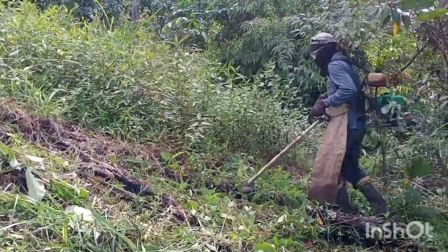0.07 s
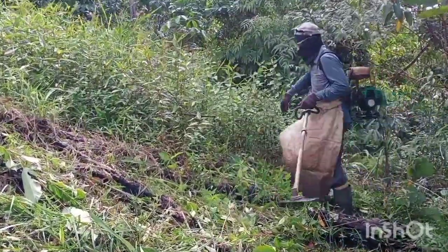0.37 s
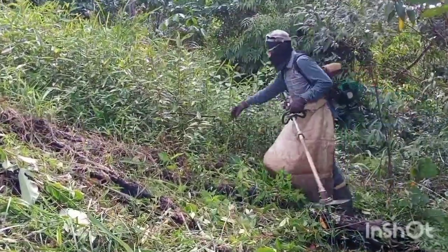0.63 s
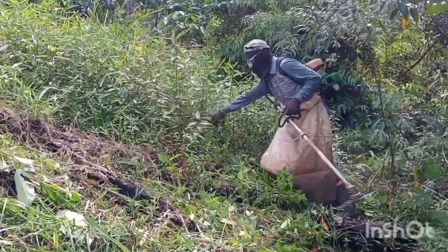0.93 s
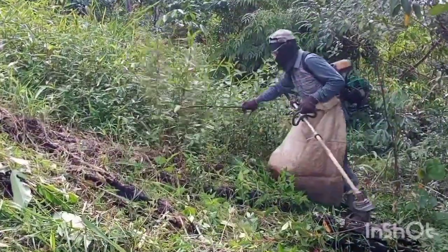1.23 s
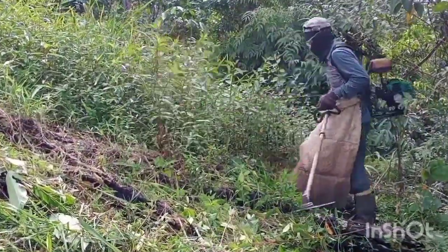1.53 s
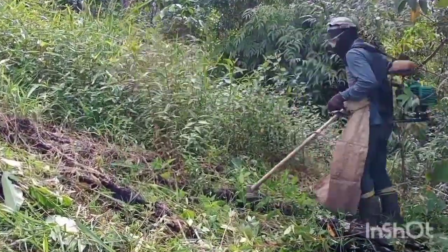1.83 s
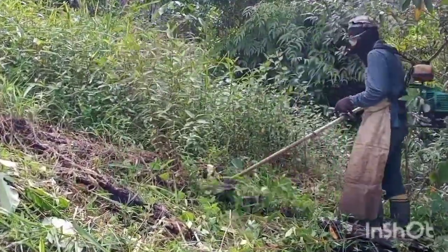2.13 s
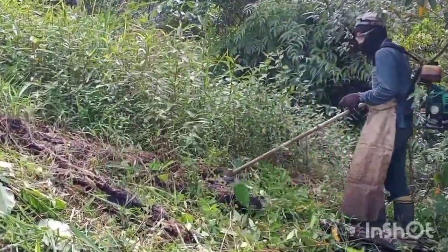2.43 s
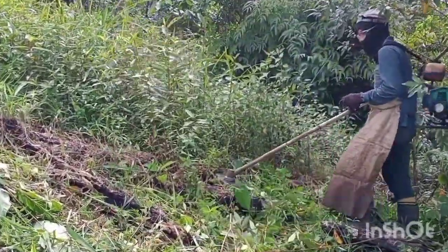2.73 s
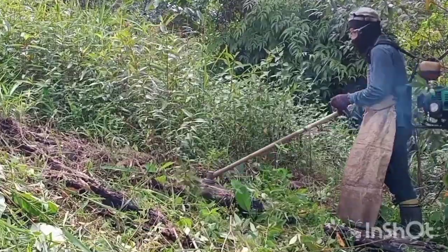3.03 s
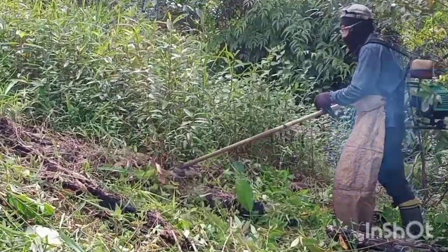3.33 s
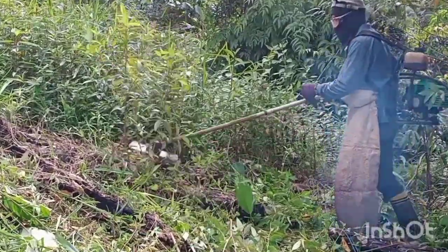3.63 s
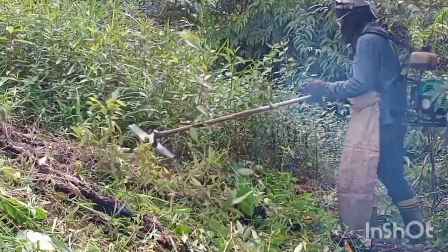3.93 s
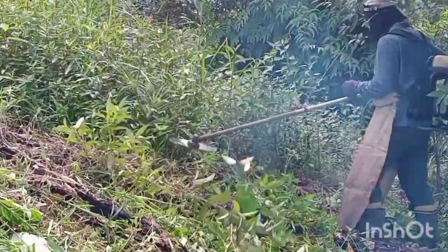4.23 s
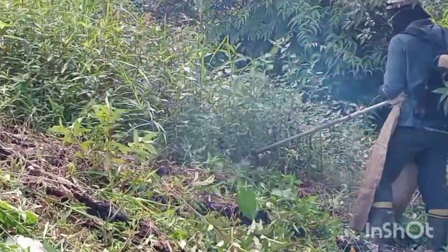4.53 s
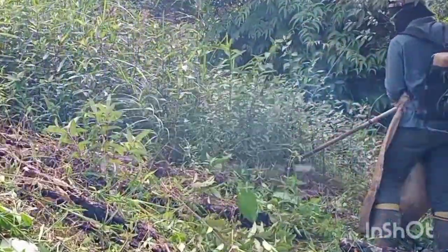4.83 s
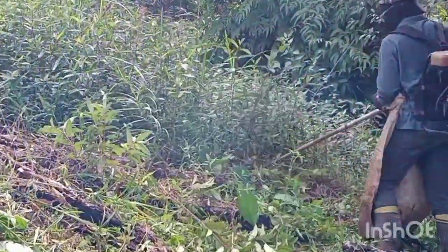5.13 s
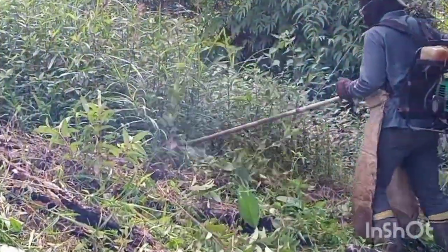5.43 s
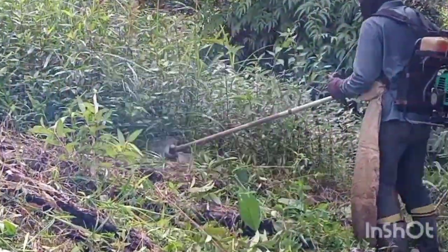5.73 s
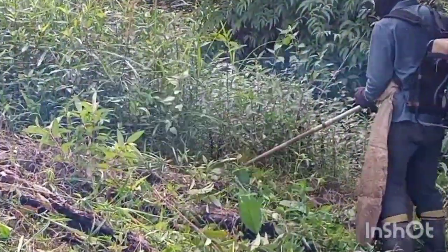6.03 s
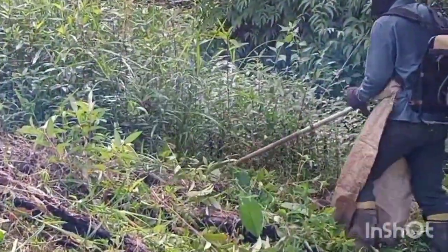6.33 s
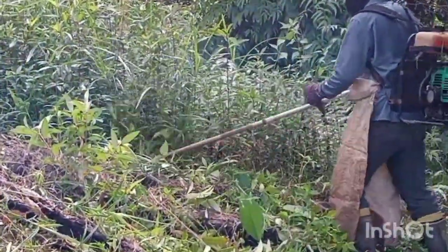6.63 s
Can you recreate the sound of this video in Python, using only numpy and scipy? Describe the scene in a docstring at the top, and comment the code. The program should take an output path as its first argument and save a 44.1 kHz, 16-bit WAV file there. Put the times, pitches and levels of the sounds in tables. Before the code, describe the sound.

On an overgrown slope, a small two-stroke brush cutter idles with uneven pops while twigs tick on its blade and a cicada buzzes and fades. The engine then revs to a snarling whine three times, sagging in between, as the blade shreds leaves, chops stems and pings against hard stalks. A brief rising whistle comes during the second rev, and the cicada returns near the end. The microphone is a few metres away.

```python
"""A backpack brush cutter on an overgrown slope. First its small two-stroke engine idles, popping on about
every third turn, while twigs tick on the steel blade and a clicking cicada buzzes and fades. From 2.4 s
the throttle is pulled three times, with coasting in between: the engine fires every second turn and the
blade tears leaves and chops stems. In the second pull the worker turns, stalks scrape the blade and a
short whistle rises. Near the end the cicada is back and the third pull begins."""
import sys
import numpy as np
from scipy import signal
from scipy.fft import rfft, irfft
from scipy.io import wavfile
from scipy.ndimage import uniform_filter1d

SR = 44100
rng = np.random.default_rng(int(sys.argv[2]) if len(sys.argv) > 2 else 0)


def master_out(mix):
    """Clip the mix to full scale and print it as 16-bit PCM to the path in sys.argv[1]."""
    frames = np.transpose(np.atleast_2d(mix))
    ceiling = np.clip(frames, -1, 1)
    pcm = np.round(ceiling * 32767).astype(np.int16)
    wavfile.write(sys.argv[1], SR, pcm)


N = 298998
TIME = np.arange(N) / SR

def undb(db):
    """Turn decibels into a gain."""
    return 10 ** (np.asarray(db) / 20)

def curves(table):
    """Join each column of a table by straight lines in time."""
    times, *columns = np.transpose(table)
    return [np.interp(TIME, times, column) for column in columns]

def unit(x):
    """Scale to an average (rms) level of 1."""
    return x / np.sqrt(np.mean(x ** 2))

def even(x):
    """Hold the average level at 1; quick detail stays."""
    size = SR // 7
    return x / np.sqrt(uniform_filter1d(uniform_filter1d(x ** 2, size), size) + 1e-18)

def fade(x, decay_s):
    """Give every click a dying tail."""
    return signal.lfilter([1], [1, -np.exp(-1 / (decay_s * SR))], x)

def ring(x, modes):
    """Ring several notes at once; alternating signs avoid holes between them."""
    return sum((-1) ** k * undb(db) * signal.lfilter(*signal.iirpeak(hz, hz / width_hz, SR), x)
               for k, (hz, width_hz, db) in enumerate(modes))

def colour(x, points, size=2048):
    """Shape the tone along (pitch, level) points; white noise keeps its power."""
    hz, db = np.transpose(points)
    grid = np.maximum(np.arange(size // 2 + 1) * SR / size, 1)
    cepstrum = irfft(np.log(undb(np.interp(np.log(grid), np.log(hz), db))))
    cepstrum[1:size // 2] *= 2  # folded so that nothing sounds before its cause
    cepstrum[size // 2 + 1:] = 0
    response = irfft(np.exp(rfft(cepstrum)))
    return signal.fftconvolve(x, response / np.linalg.norm(response))[:N]

def walk(rate):
    """Glide to a new random value, roughly within 1 of zero, rate times a second."""
    step = int(SR / rate)
    return 1.2 * uniform_filter1d(np.repeat(rng.standard_normal(N // step + 1), step), step)[:N]

def clicks(times, sizes):
    """One click at each time, shared between two neighbouring samples."""
    place = np.clip(times * SR, 0, N)
    i = place.astype(int)
    before = np.bincount(i, sizes * (1 - place + i), N + 2)
    after = np.bincount(i + 1, sizes * (place - i), N + 2)
    return (before + after)[:N]

def grains(rate, spread_db):
    """Tiny random cracks of unequal size, about rate a second."""
    hit = rng.random(N) < rate / SR
    return unit(hit * rng.choice([-1, 1], N) * undb(spread_db * np.clip(rng.standard_normal(N), -3, 2)))

def strokes(cycles, scatter_db, jitter_s, lead_s=0, alternation=.91):
    """One pulse a cycle; a strong one tends to follow a weak one, and comes up to lead_s early."""
    times = np.interp(np.arange(1, int(cycles[-1]) + 1), cycles, TIME)
    chance = rng.standard_normal((len(times), 2))
    strength = np.tanh(signal.lfilter([1], [1, alternation], chance[:, 0]))
    return -clicks(times - lead_s * strength + jitter_s * chance[:, 1], undb(scatter_db * strength))

def bush_echo(x, echo_db, fade_s):
    """Ground and bushes scatter a short, weak echo."""
    age = TIME[:SR // 4]
    tail = rng.standard_normal(len(age)) * undb(-60 * age / fade_s) * (age > .003)
    return x + undb(echo_db) * signal.fftconvolve(x, tail / np.linalg.norm(tail))[:N]

# tone of the outdoor air: (pitch [Hz], level [dB])
AIR_TONE = [(25, -17), (70, -8), (200, -8.5), (600, -10), (1500, -29), (5000, -64), (15000, -52)]
def air(level_db=-49):
    """Outdoor air makes a faint, low rush."""
    return undb(level_db) * colour(rng.standard_normal(N), AIR_TONE)

# cicada calls: (full voice at [s], fades from [s], level [dB], body pitch [Hz])
CALLS = [(0, 1.72, -35.5, 6120), (6.2, 7.7, -39, 6126)]
def cicada(click_hz=215.8, rise_db_per_s=18, sag_db_per_s=4, fade_db_per_s=23, sink_hz_per_s=200):
    """Fast, regular clicks ring the insect's body, whose note sinks and narrows as a call tires."""
    cycles = np.cumsum(click_hz * (1 + .00225 * walk(150))) / SR
    gain, weighted_hz, weighted_width = 1e-18, 0, 0
    for full, fades, db, start_hz in CALLS:
        age = np.clip(TIME - full, 0, fades - full)
        call = undb(db - rise_db_per_s * np.maximum(full - TIME, 0) - sag_db_per_s * age
                    - fade_db_per_s * np.maximum(TIME - fades, 0))
        gain += call
        weighted_hz += call * (start_hz - sink_hz_per_s * age)
        weighted_width += call * 870 * np.exp(-age / 5.4)
    centre_hz, width_hz = weighted_hz / gain, weighted_width / gain
    out = 0
    for k in range(24, 41):  # overtones of the click rate
        hz = k * click_hz
        body = 1 / (1 + ((hz - centre_hz) / width_hz) ** 2) ** 2
        upper_peak = .52 / (1 + ((hz - 8200) / width_hz) ** 2)
        flutter = undb(2 * walk(35) + 2 * walk(7))
        out += (body + upper_peak) * flutter * np.sin(2 * np.pi * (k * cycles + rng.random()))
    return even(out) * gain

# path of the whistle: (time [s], pitch [Hz], level [dB])
WHISTLE_PATH = [(5.44, 1062, -55), (5.52, 1115, -34), (5.61, 1286, -29), (5.68, 1391, -38),
                (5.76, 1460, -52)]
def whistle():
    """A slightly unsteady tone slides upward."""
    hz, db = curves(WHISTLE_PATH)
    sounding = (TIME > WHISTLE_PATH[0][0]) & (TIME < WHISTLE_PATH[-1][0])
    cycles = np.cumsum(hz * (1 + .0095 * walk(120))) / SR
    return np.sqrt(2) * np.sin(2 * np.pi * cycles) * undb(db) * sounding

# twigs touching the blade: (time [s], level [dB])
TWIG_HITS = [(0.081, -33.5), (.11, -32), (.146, -30), (.171, -30), (0.23, -30), (.363, -39), (0.392, -28.5),
             (0.697, -30), (.861, -36), (0.899, -32), (.944, -31.5), (1.227, -33), (1.662, -34.5),
             (1.932, -32), (2.175, -35), (2.398, -40), (2.432, -32)]
# tone of a twig: (pitch [Hz], level [dB])
TWIG_TONE = [(900, -16), (2300, -3.5), (3500, -3), (5200, -9), (7000, -4), (7800, 3), (8500, 4),
             (10500, -6), (15000, -18)]
def twigs(decay_s=.01):
    """Each twig ticks on the slowly turning blade with a small, dry crackle."""
    envelope, age = np.zeros(N), TIME[:SR // 10]
    for start, db in TWIG_HITS:
        i = int(start * SR)
        envelope[i:i + len(age)] += undb(db) * np.exp(-age / decay_s)
    return colour(envelope * grains(rate=5000, spread_db=-4), TWIG_TONE)

# tone of tearing grass: (pitch [Hz], level [dB])
GRASS_TONE = [(3000, -12), (6000, -7), (9500, 0), (12500, 0), (15500, -6)]
def grass(middle_s=5.57, half_length_s=.13, level_db=-34):
    """Soft grass tears into an airy spray of fine cracks."""
    swell = np.exp(-((TIME - middle_s) / half_length_s) ** 2)
    return colour(grains(rate=9900, spread_db=3), GRASS_TONE) * swell * undb(level_db)

# notes of the blade and its guard: (pitch [Hz], time to fade 60 dB [s], level when scraped [dB])
BLADE_NOTES = [(395.7, 0.52, -23), (2345, 0.15, -3), (3020, 0.029, 0), (3525, 0.14, 1), (4160, 0.092, -9),
               (4770, 0.2, -1), (6280, 0.14, -1), (6940, 0.061, -9), (8640, 0.099, 9), (9400, 0.071, -3)]
# woody stalks scraping: (time [s], length [s], level [dB])
STALK_SCRAPES = [(4.772, .06, -30), (4.86, .095, -26.5)]
def scrapes(width_hz=59.6, edge_s=.0067):
    """A stalk catches and slips over the steel; its touch rings, damps and widens every note."""
    pressure = sum(undb(db) * np.clip(np.minimum(TIME - start, start + length - TIME) / edge_s, 0, 1)
                   for start, length, db in STALK_SCRAPES)
    friction = grains(rate=3000, spread_db=3) * undb(3 * walk(90))
    return even(ring(friction, [(hz, width_hz, db) for hz, _, db in BLADE_NOTES])) * pressure

# hard stalks hitting the blade: (time [s], level [dB], favoured pitch [Hz])
STALK_HITS = [(.652, -34, 2350), (.654, -32, 4070), (1.439, -34.5, 2330), (1.487, -33, 2930),
              (3.477, -12.5, 3320), (3.718, -28, 380.5), (3.872, -19.5, 7140), (4.681, -26, 8510),
              (4.785, -26, 3480), (4.87, -17, 8610), (5.152, -13.5, 2300), (5.205, -23, 2403),
              (5.211, -21, 4000), (5.287, -16, 8500), (5.81, -27, 400), (6.025, -17, 8430),
              (6.09, -34, 400)]
def pings(spread_octaves=.11, rise_s=.0005):
    """A stalk rings the blade's notes near one pitch; it keeps touching, so the ring is rough."""
    out, age = np.zeros(N), TIME[:SR // 3]
    swell = 1 - np.exp(-age / rise_s)
    for start, db, favoured_hz in STALK_HITS:
        i = int(start * SR)
        touch, slip = walk(300)[:len(age)], walk(400)[:len(age)]
        for hz, fade_s, _ in BLADE_NOTES:
            share = 1 / (1 + (np.log2(hz / favoured_hz) / spread_octaves) ** 2)
            envelope = share * swell * undb(db - 60 * age / fade_s + 2.2 * touch)
            out[i:i + len(age)] += envelope * np.sin(2 * np.pi * hz * age + .75 * slip)
    return out

# bright notes of the blade: (pitch [Hz], width [Hz], level [dB])
SPATTER_NOTES = [(7720, 200, 2.5), (8500, 480, 5.5), (9520, 120, -5)]
def spatter():
    """Flung bits of leaf strike the blade; each rings it briefly."""
    strikes = fade(np.abs(grains(rate=110, spread_db=2.2)), decay_s=.0025)
    return even(ring(strikes * rng.standard_normal(N), SPATTER_NOTES))

# notes of the casing and shaft tube: (pitch [Hz], width [Hz], level [dB])
CASING_NOTES = [(1962, 75, 3.5), (2316, 82, 3.5), (2805, 80, -2.5), (3377, 110, 1), (3580, 100, 3)]
def rattle(tufts):
    """Loose metal parts tick against the casing and the shaft tube."""
    return even(sum(ring(grains(rate=160, spread_db=6) * tufts, [note]) for note in CASING_NOTES))

# sweeps through plants: (deepest at [s], half length [s], leaf hiss [dB], stem crackle [dB])
BLADE_SWEEPS = [(0.297, 0.81, -46.5, -45), (2.014, 0.32, -51.5, -45.5), (2.616, 0.022, -40, -29),
                (3.316, 0.083, -27.5, -26.5), (3.424, 0.048, -23, -29), (3.488, 0.018, -20, -25),
                (3.767, 0.16, -38, -30.5), (4.685, 0.045, -29, -24.5), (4.786, 0.015, -31, -20),
                (4.906, 0.093, -40, -30), (5.22, 0.077, -25, -22.5), (5.42, 0.53, -27.5, -23.5),
                (5.853, 0.022, -20, -25), (6.033, 0.06, -22, -26), (6.239, 0.064, -27, -27),
                (6.698, 0.26, -31, -28.5)]
def sweep_levels(revs, throttle, exit_share=.86):
    """Hiss and crackle in dB: the spinning blade and shaft, plus a swell for each sweep."""
    power = undb([-48.5 + 9 * revs + 5.5 * throttle, -43 + 12 * revs + 3 * throttle]) ** 2
    for deepest, length, hiss_db, crackle_db in BLADE_SWEEPS:
        width_s = np.where(TIME < deepest, length, length * exit_share)
        depth = np.exp(-((TIME - deepest) / width_s) ** 2)
        power += np.outer(undb([hiss_db, crackle_db]) ** 2, depth)
    return 10 * np.log10(power)

# tones of torn leaves and cracking stems: (pitch [Hz], level [dB])
LEAF_TONE = [(3000, -33.5), (5200, -8), (6300, -2.5), (7100, -10), (7600, 2.5), (8100, 2.5), (8550, 4.5),
             (9100, 0.5), (10200, -5), (12000, -12), (15500, -13)]
STEM_TONE = [(400, -27), (1000, -1), (1700, -5), (2350, -2), (2750, 2), (3400, -0.5), (4100, -3.5),
             (5200, -10.5), (6300, -10.5), (7500, 0.5), (12000, -24)]
def blade(turns, revs, throttle):
    """The blade shreds plants into dense cracks, bunched by the engine's beat and by uneven tufts."""
    hiss_db, crackle_db = sweep_levels(revs, throttle)
    cutting = np.clip((crackle_db + 36) / 12, 0, 1)
    beat = 1 + .067 * np.cos(np.pi * turns)
    tears = fade(np.abs(grains(rate=45, spread_db=2.5)), decay_s=.0031)
    tufts = beat * undb(.4 * walk(45) + 1.1 * walk(220)) * (1 + .26 * unit(tears))
    shared = grains(rate=2500, spread_db=2.5)
    leaf_cracks = (shared + .8 * rng.standard_normal(N)) * tufts * undb(1.4 * walk(70))
    stem_cracks = (1.07 * shared + grains(rate=5000, spread_db=2.8)) * tufts * undb(1.1 * walk(70))
    stems = even(colour(stem_cracks, STEM_TONE)) * undb(-5 + 1.16 * cutting)
    metal = rattle(tufts) * undb(-6 - 8.4 * cutting)  # stands out when little is cut
    leaves = even(colour(leaf_cracks, LEAF_TONE)) * undb(-.23) + spatter() * undb(-3.5)
    return leaves * undb(hiss_db) + (stems + metal) * undb(crackle_db)

# knocks and chopped stems: (time [s], level [dB], extra treble [dB], rise [s], hold [s])
STEM_CHOPS = [(0.459, -26.5, 3, .002, 0.0054), (.5585, -24, -10, .001, .001),
              (0.6505, -24, 2.5, 0.001, 0.0046), (1.434, -27.5, 0, 0.0033, .006),
              (1.487, -24, -0.5, 0.0033, 0.0049), (1.981, -23.5, -3.5, 0.0034, 0.007),
              (2.016, -27.5, -4, 0.0025, 0.0067), (2.568, -16.5, -4.5, 0.001, .004),
              (2.664, -16, -1, .002, .002), (2.832, -18, -1, 0.0026, .002),
              (2.996, -16, 0.5, 0.0018, 0.0016), (3.247, -15, -2, 0.0009, 0.0022),
              (3.277, -14, -2, 0.00075, 0.0034), (3.296, -10.5, -0.5, 0.00088, .003),
              (3.391, -16, 2.5, 0.0016, 0.0027), (3.406, -20, 2, .001, 0.0025),
              (3.4207, -11, 1, .001, 0.0044), (3.4385, -4, -0.5, 0.00093, 0.003),
              (3.457, -11, -8, .002, .004), (3.478, -8, -1, 0.0009, 0.0028), (3.498, -9, -11, .001, .002),
              (3.707, -12.5, -2, .007, 0.0093), (3.762, -15, -3.5, 0.00094, 0.0088),
              (3.796, -13, -2.5, 0.0056, 0.0057), (4.64, -17.5, 4.5, 0.0018, 0.0052),
              (4.678, -15, 2, .002, 0.0055), (4.755, -13, -0.5, 0.0022, 0.0038),
              (4.774, -13, 2, 0.0027, 0.0046), (4.855, -13.5, 4, 0.0023, .003),
              (4.869, -12.5, 3.5, 0.0019, 0.0048), (4.89, -17.5, 6.5, .002, .005),
              (5.16, -15, -4, 0.0021, .003), (5.286, -13.5, 2, .002, .004),
              (5.743, -7.5, -3, 0.00062, 0.017), (5.841, -17, -15, .004, 0.0096),
              (6.01, -13.5, -8, .003, 0.0076)]
# tone of a chop: (pitch [Hz], level [dB])
CHOP_TONE = [(100, 1.5), (400, 0), (900, 0.5), (1700, 1.5), (2400, 6.5), (3500, 5), (5200, 2.5), (6500, 9),
             (9000, 0), (15000, -32)]
def chops(decay_s=.0044):
    """Each stem splits in a burst of fibre cracks that lasts while the blade passes through."""
    body, bright = np.zeros(N), np.zeros(N)
    for start, db, treble_db, rise_s, hold_s in STEM_CHOPS:
        i = int(start * SR)
        age = TIME[:min(SR // 5, N - i)]
        dying = np.exp(-np.maximum(age - rise_s - hold_s, 0) / decay_s)
        burst = undb(db) * np.minimum(age / rise_s, 1) * dying
        body[i:i + len(age)] += burst
        bright[i:i + len(age)] += burst * undb(treble_db)
    fibres = grains(rate=14000, spread_db=-1.5)
    return undb(-8) * colour(body * fibres, CHOP_TONE) + undb(-4.5) * colour(bright * fibres, LEAF_TONE)

# tone of rushing gas: (pitch [Hz], level [dB])
RASP_TONE = [(150, -15), (350, -8), (450, -2), (700, -4.5), (1000, -14), (1350, -2.5), (1700, -12),
             (2050, -11.5), (3000, -17), (6000, -31)]
def rasp(turns):
    """Swirling gas follows each exhaust pulse."""
    puffs = 1 + .72 * np.exp(-(turns % 1) / .089)
    return even(colour(rng.standard_normal(N) * puffs, RASP_TONE))

# notes of the engine cover: (pitch [Hz], width [Hz], level [dB])
COVER_NOTES = [(2078, 69, 11.5), (3700, 650, -1.5)]
def clack(fired):
    """Hard firings rattle the cover."""
    jolts = fade(fired ** 2, decay_s=.0023)
    return even(ring(jolts * rng.standard_normal(N), COVER_NOTES))

# notes of the air intake, open and shut: (pitch [Hz], width [Hz], level [dB])
OPEN_NOTES = [(1138, 224, -1), (1492, 170, 2)]
SHUT_NOTES = [(1267, 180, 0)]
def intake(firings, throttle):
    """The air intake honks with each firing; another note joins as the throttle shuts."""
    honk = even(ring(ring(firings, OPEN_NOTES), OPEN_NOTES)) * undb(-40.5 + 5.6 * throttle)
    coast = even(ring(ring(firings, SHUT_NOTES), SHUT_NOTES)) * undb(-40) * (1 - throttle)
    return honk + coast

# tone of the muffler shell: (pitch [Hz], level [dB])
SNARL_TONE = [(600, -22.5), (920, -3.5), (1020, -6.5), (1170, 7), (1260, 6), (1400, 2.5), (1530, -4),
              (1680, -11), (1920, 2), (2150, -12), (3200, -28), (8000, -59)]
def snarl(firings):
    """The muffler shell gives off the high overtones of the firings."""
    return even(colour(firings, SNARL_TONE))

# tone of the buzz: (pitch [Hz], level [dB])
BUZZ_TONE = [(600, -30.5), (850, 12.5), (950, 9.5), (1100, 1), (1300, 7), (1480, 0.5), (1680, -6.5),
             (2100, 3), (3500, -38.5)]
def buzz(piston):
    """One piston pulse a turn blends into a buzz."""
    return even(colour(piston, BUZZ_TONE))

# tone of the growl: (pitch [Hz], level [dB])
GROWL_TONE = [(70, -41), (110, -3), (142, 0.5), (188, -6), (238, 2.5), (285, -0.5), (340, -39.5),
              (450, -37.5)]
def growl(cycles):
    """Strong and weak firings put a growl between the low overtones."""
    return even(colour(strokes(cycles, scatter_db=9.5, jitter_s=8e-5), GROWL_TONE))

def hum(turns):
    """The muffler's hollow rings on, two swings to a turn."""
    return np.sqrt(2) * np.cos(4 * np.pi * turns) * undb(walk(20))

def drone(cycles):
    """Steady firing makes one low tone."""
    return np.sqrt(2) * np.sin(2 * np.pi * (cycles + .71)) * undb(.28 * walk(33))

# stumbles of the idle: (start [s], end [s], extra level [dB])
IDLE_STUMBLES = [(.2, .36, 1), (.45, .8, -3), (.8, 1.13, -0.5), (1.37, 1.5, 3.5), (1.76, 2.08, 0.5),
                 (2.22, 2.42, -2.5)]
# gaps between pops in a stumble, picked at random: (gap [turns])
STUMBLE_GAPS = [2, 3, 3, 5]
# tone of a pop: (pitch [Hz], level [dB])
POP_TONE = [(45, -29), (85, -4), (150, -3.5), (230, -2.5), (330, -15.5), (600, -25), (1500, -66)]
def idle_pops(turns, scatter_db=2.5):
    """At idle the fuel fires every third turn; in a stumble it may fire early and weakly, or late."""
    pop_turns, sizes, turn = [], [], 1
    for gap, scatter in zip(rng.choice(STUMBLE_GAPS, size=400), rng.uniform(-1.1, 1, size=400)):
        now = np.interp(turn, turns, TIME)
        stumble_db = [db for start, end, db in IDLE_STUMBLES if start < now < end]
        gap = gap if stumble_db else 3
        turn += gap
        pop_turns.append(turn)
        sizes.append(min(gap / 3, 1) * undb(sum(stumble_db) + scatter_db * scatter))
    return colour(clicks(np.interp(pop_turns, turns, TIME), np.array(sizes)), POP_TONE)

# notes of the exhaust pipe while speeding up: (pitch [Hz], width [Hz], level [dB])
PIPE_NOTES = [(610, 156, 4), (900, 230, -1), (1261.4, 230, -7)]
def whine(chuffs, piston, idle):
    """Every turn rings the pipe: a sputter at first, then a clear rising whine."""
    pulses = idle ** 2 * chuffs + (1 - idle ** 2) * piston
    return even(ring(ring(pulses, PIPE_NOTES), PIPE_NOTES))

# tones of the exhaust at idle and at speed: (pitch [Hz], level [dB])
CHUFF_TONE = [(250, -9), (370, -6.5), (430, -2.5), (510, 6.5), (600, 2), (750, 3.5), (860, -0.5),
              (980, -11), (1300, -30), (2000, -25)]
BARK_TONE = [(250, -20.5), (376, -20), (470, 0.5), (565, 2.5), (660, 3), (755, 2.5), (805, -2.5), (850, -4),
             (940, -14), (1040, -12.5), (1200, -28.5), (2000, -45)]
def exhaust(chuffs, barks, idle, strain):
    """Gas pulses chuff at idle and bark at speed; under strain they weaken and sputter."""
    gas = even(idle * colour(chuffs, CHUFF_TONE) + (1 - idle) * colour(barks, BARK_TONE))
    return gas * undb(strain * (-10 - 2.5 * walk(120)))

def engine(turns, revs, throttle, sag_db, turn_s=4.19, turn_length_s=.31, lead_turns=.049):
    """Each turn pushes out a gas pulse; at speed every second one fires, stronger and a little early."""
    idle = np.clip(1 - 2 * revs, 0, 1)
    strain = throttle * (1 - revs)  # throttle open, speed still low
    sag = undb(sag_db * idle)
    # the worker turns: the cover faces away and the intake comes to the front
    turned = np.clip((TIME - turn_s) / turn_length_s + .5, 0, 1)
    cycles = turns / 2
    piston = strokes(turns, scatter_db=1.5, jitter_s=1e-5)
    unfired = strokes(cycles + .5, scatter_db=1.5, jitter_s=3e-5)
    fired = strokes(cycles + lead_turns * revs / 2, scatter_db=2, jitter_s=2e-5, lead_s=5e-5)
    chuffs = strokes(turns, scatter_db=2, jitter_s=6e-4)
    barks = unfired + fired * undb(8 * revs)
    out = exhaust(chuffs, barks, idle, strain) * undb(-41.5 + 10 * revs + 8.5 * throttle) * sag
    out += whine(chuffs, piston, idle) * undb(-25) * strain
    out += buzz(piston) * undb(-53 + 14.64 * revs + 2 * throttle) * sag
    out += growl(cycles) * undb(-41.5 - 2.55 * revs + 8.5 * throttle) * sag * (1 - idle)
    out += hum(turns) * undb(-48.5) * idle
    out += drone(cycles) * undb(-53.5 + 18 * revs + 4 * throttle) * sag * (1 - idle)
    out += rasp(turns) * undb(-47 + 6.5 * revs + 6.5 * throttle + 3.1 * strain) * sag
    out += clack(fired) * undb(-37) * throttle * (1 - .55 * turned)
    firings = strokes(cycles, scatter_db=1, jitter_s=1e-5)
    out += snarl(firings) * undb(-60 + 19 * revs - 1.5 * throttle + 2.1 * turned)
    out += intake(firings, throttle) * turned
    return out + idle_pops(turns) * undb(-9.5) * sag ** .95 * idle

# pulls of the throttle: (pressed [s], released [s], opening [0-1])
THROTTLE_PULLS = [(2.362, 3.43, 0.97), (3.971, 5.7, 1), (6.291, 6.9, 0.54)]
def throttle_opening(open_s=.25, close_s=.14):
    """Each pull opens the throttle, holds it and lets it close."""
    return sum(opening * np.clip((TIME - pressed) / open_s, 0, 1)
               * np.clip(1 - (TIME - released) / close_s, 0, 1)
               for pressed, released, opening in THROTTLE_PULLS)

# speed of the engine: (time [s], turns a second [Hz])
ENGINE_SPEED = [(0, 81.3), (.17, 77), (.3, 78.6), (.52, 80.46), (.88, 75.3), (1.17, 71.5), (1.4, 76.5),
                (1.68, 79.04), (1.87, 77.13), (2.22, 80.5), (2.35, 77), (2.41, 88), (2.5, 91.4),
                (2.588, 107.4), (2.66, 129), (2.7, 149), (2.758, 166.4), (2.854, 184.1), (3.44, 189.2),
                (3.54, 183), (3.78, 174.3), (4.07, 155.7), (4.27, 185), (4.72, 188.8), (5.75, 188.3),
                (5.82, 181.5), (6.4, 163.9), (6.57, 185.7), (6.78, 187.8)]
def brush_cutter(idle_hz=80, top_hz=184.5, idle_wobble=.01135):
    """The engine rides in the open and drives the blade, which echoes more down among the plants."""
    hz, = curves(ENGINE_SPEED)
    revs = np.clip((hz - idle_hz) / (top_hz - idle_hz), 0, 1)  # 0 at idle, 1 at top speed
    turns = np.cumsum(hz * (1 + idle_wobble * (1 - revs) * walk(30))) / SR
    sag_db = .47 * np.clip(hz - idle_hz, -9, 4)  # a slower idle is weaker, a faster one firmer
    throttle = throttle_opening()
    motor = bush_echo(engine(turns, revs, throttle, sag_db), echo_db=-20, fade_s=.1)
    cutting = blade(turns, revs, throttle) + grass() + chops() + twigs() + scrapes() + pings()
    return motor + bush_echo(cutting, echo_db=-7.5, fade_s=.45)

def scene():
    """The machine, the cicada and the whistle over faint air, the same in both ears."""
    mono = brush_cutter() + cicada() + whistle() + air()
    return np.array([mono, mono])

def record(dry, bass_hz=32, top_hz=15550):
    """A phone a few metres away thins the deepest bass and cuts the highest treble."""
    thinned = signal.sosfilt(signal.butter(2, bass_hz, "high", fs=SR, output="sos"), dry)
    return signal.sosfilt(signal.ellip(10, .2, 80, top_hz, fs=SR, output="sos"), thinned)

dry = scene()
out = record(dry)
master_out(out)
```